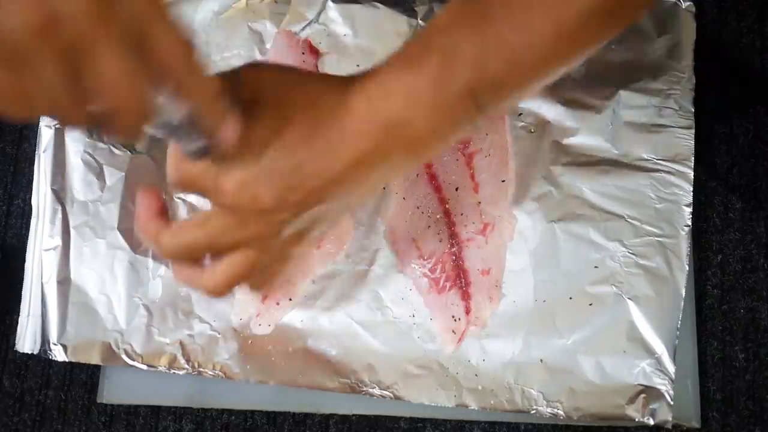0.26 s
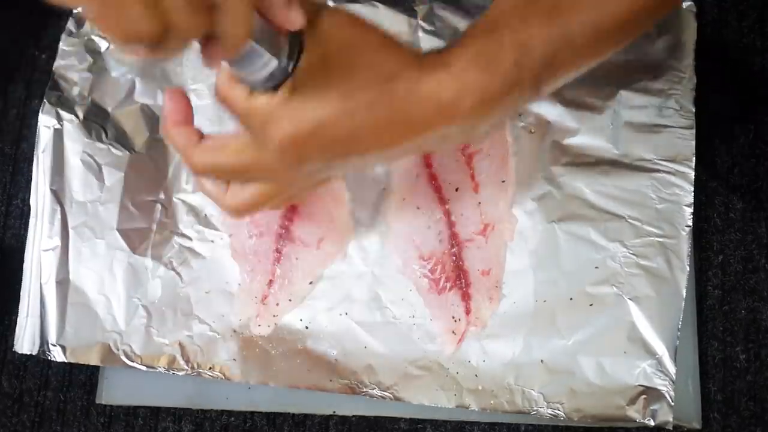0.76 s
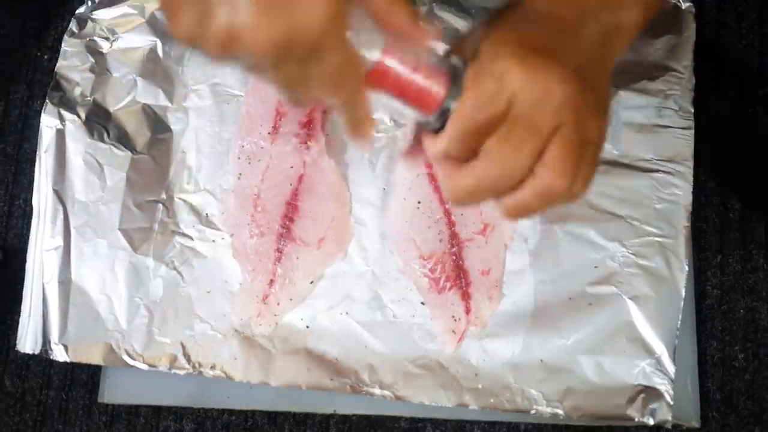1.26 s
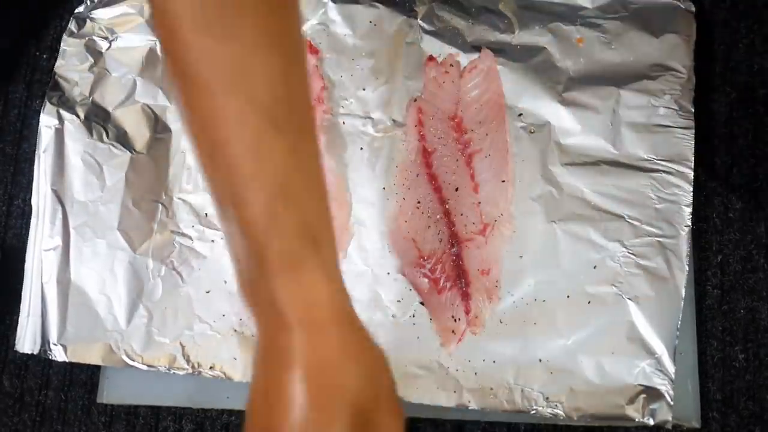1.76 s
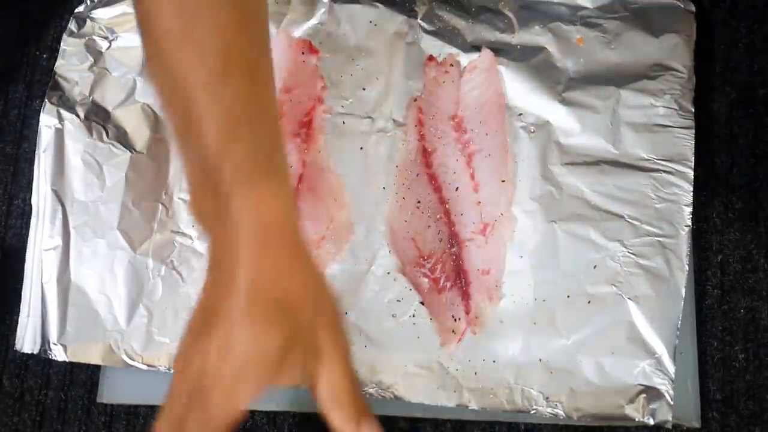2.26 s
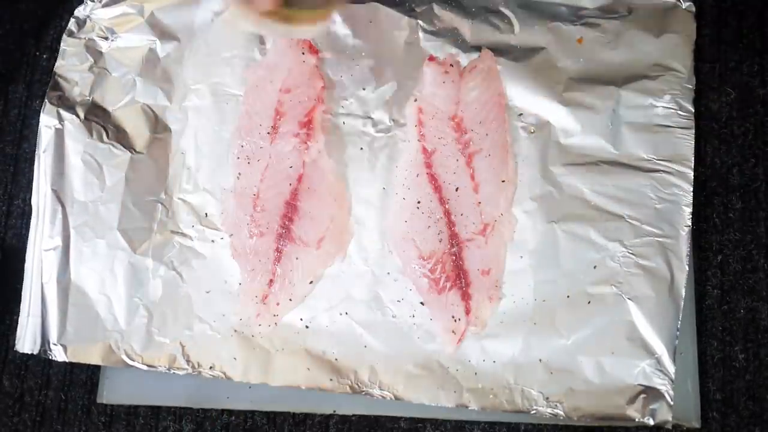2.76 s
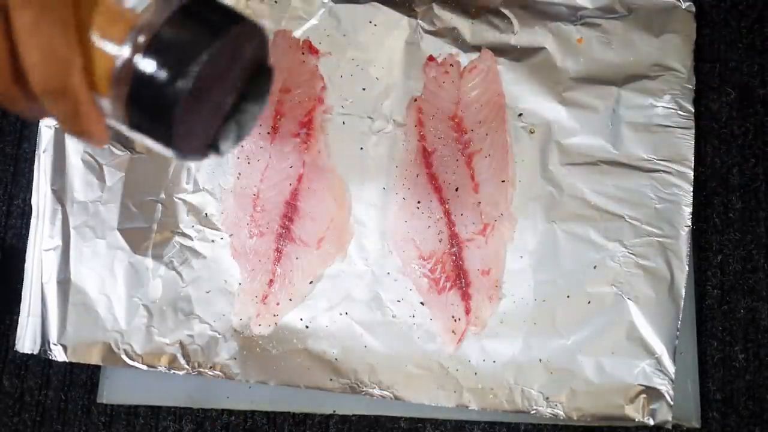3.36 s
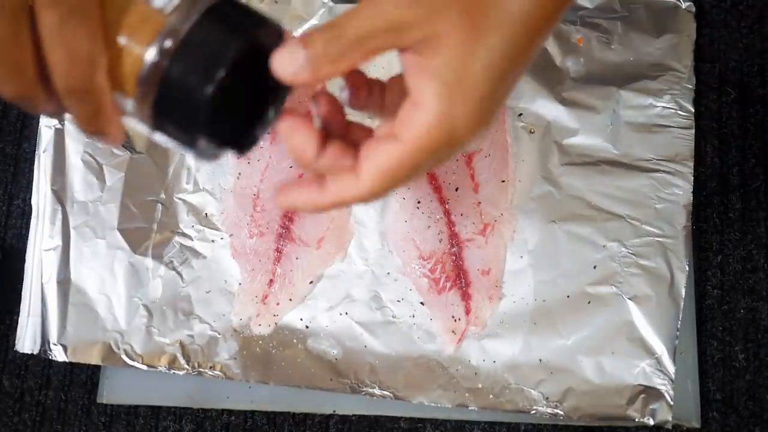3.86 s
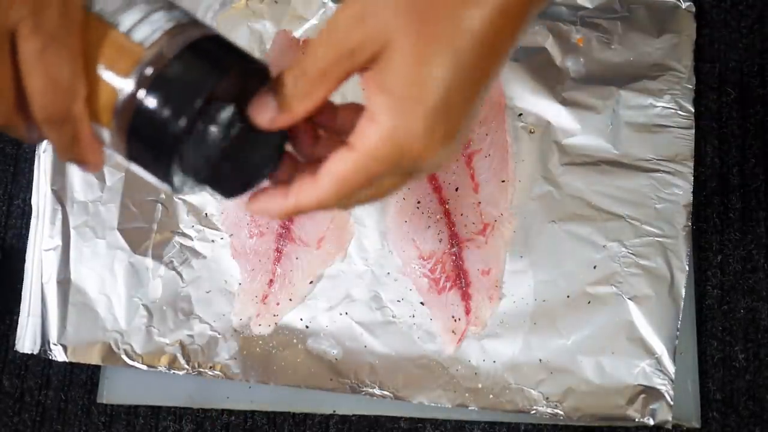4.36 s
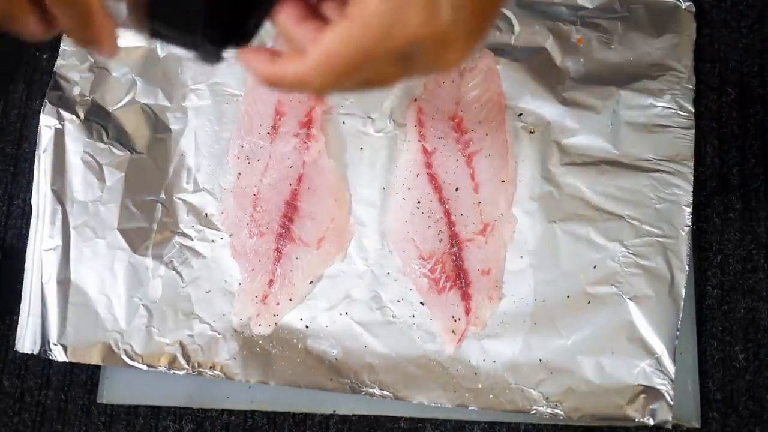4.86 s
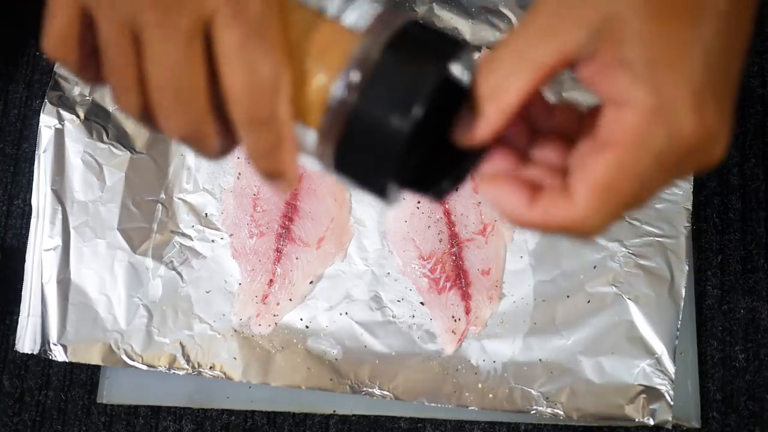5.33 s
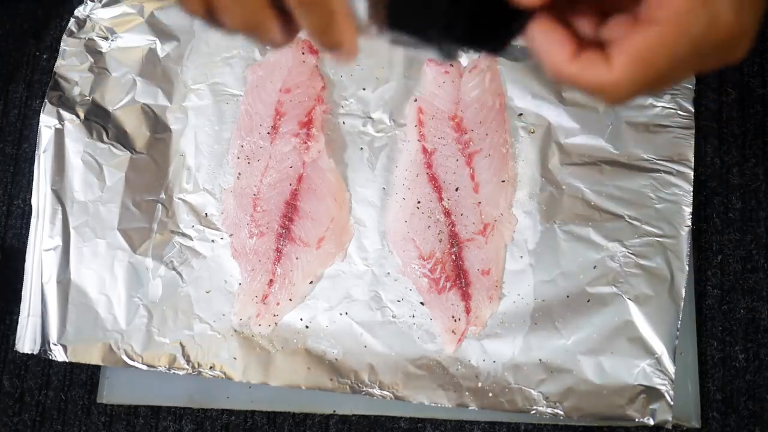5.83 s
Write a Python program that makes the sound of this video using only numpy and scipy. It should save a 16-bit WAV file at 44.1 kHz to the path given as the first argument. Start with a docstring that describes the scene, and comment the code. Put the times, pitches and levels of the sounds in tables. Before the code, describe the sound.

A salt mill crunches through four short twists, is set down with a hard clack, then a seasoning jar is tapped and shaken in soft hisses.

```python
"""Crystals crunch and crack in the ringing cavity of a salt mill, twisted four times over fish on foil.
The salt slides back in its jar, a hand bumps the table and the mill is set down with a clack.
Then a jar of fine seasoning is tapped and shaken: the powder hisses to and fro and rains on the foil.
Random grain trains excite resonances and coloured clicks for the salt and powder; bursts of noise
excite them for each contact. Sparse reflections, low hums and quiet air surround the work."""
import sys
import numpy as np
from scipy import signal
from scipy.fft import rfft, irfft
from scipy.io import wavfile

SR = 44100
rng = np.random.default_rng(int(sys.argv[2]) if len(sys.argv) > 2 else 0)


def log_audio(samples):
    """Write samples as a 16-bit WAV file to the path given in sys.argv[1]."""
    # one column per channel
    frames = np.atleast_2d(samples).T
    # limit to full scale, then quantise
    limited = np.clip(frames, -1, 1)
    pcm = np.round(limited * 32767).astype(np.int16)
    wavfile.write(sys.argv[1], SR, pcm)


N = 268856
TIME, SHORT = np.arange(N) / SR, np.arange(8192) / SR  # seconds: the whole scene, one short sound

# Resonances of the mill's body. Each row: frequency in Hz, width in Hz, relative level in dB.
MILL_MODES = [(411.4, 59, -8), (880, 250, -12.5), (1815, 520, 1), (2660, 634, 1), (3470, 530, -3.5),
              (4230, 660, -4)]
# Forward twists that crush the salt. Each row: start in seconds, length in seconds, crushing level in dB,
# growth over the twist in dB, falling-salt level in dB.
TWISTS = [(0.046, 0.093, -27, 4.5, -37.5), (0.463, 0.075, -27.5, 7.5, -38), (0.872, .09, -24, -5.5, -40),
          (1.263, 0.068, -22.5, 1.5, -37.5)]
# Light turns back, the burrs only scraping. Each row: start in seconds, length in seconds,
# scraping level in dB, dying-away time in seconds, falling-salt level in dB.
RETURNS = [(0.225, 0.11, -37, 0.045, -41), (0.611, 0.14, -43, 0.066, -41.5),
           (1.068, .105, -42, 0.036, -43.5)]
# Loose salt thrown about as the mill is moved and tipped upright. Each row: start in seconds,
# sliding time in seconds, rattle level in dB, settling time in seconds, level of the mill's ring in dB.
SPILLS = [(0.2, 0.024, -47, 0.023, -58), (1.043, .004, -44.5, 0.016, -41.5), (1.2, 0.049, -47.5, .02, -71),
          (1.408, .01, -36, 0.094, -48.5), (1.56, 0.069, -49, .045, -60), (1.754, .02, -48, .01, -62),
          (1.783, 0.037, -31.5, 0.029, -35), (1.894, 0.029, -46.5, 0.031, -49.5),
          (2.004, 0.007, -49.5, 0.027, -51.5)]
# The mill lands and rocks on its base. Each row: time in seconds, level in dB.
CLACKS = [(2.2883, -12.5), (2.3038, -28.5), (2.3118, -30)]
RETURN_RISE_S, SPILL_RISE_S = 0.0045, 0.0061


def gain_of(db):
    """Decibels to an amplitude ratio, by the logarithmic law of level."""
    return 10 ** (np.asarray(db) / 20)


def evened(x):
    """Normalises the mean power, to rms 1."""
    return x / np.sqrt(np.mean(x ** 2) + 1e-20)


def blow(x, db):
    """Sets a short sound by its energy: that of an rms at this level lasting 4 ms."""
    blow_s = .004
    return gain_of(db) * x * np.sqrt(blow_s * SR / np.sum(x ** 2))


def read(points, hz):
    """Interpolates a spectrum over log frequency."""
    f, value = np.transpose(points)
    return np.interp(np.log(hz + 1), np.log(f + 1), value)


def level(rows):
    """An envelope linear in decibels between (seconds, dB) points, silent outside them."""
    s, db = np.transpose(rows)
    inside = (TIME >= s[0]) * (TIME <= s[-1])
    return gain_of(np.interp(TIME, s, db)) * inside


def add(mix, s, sound):
    """Superposes a sound on the mix at a time in seconds."""
    part = mix[max(round(s * SR), 0):][:len(sound)]
    part += sound[:len(part)]


def click(points):
    """Minimum-phase click: the Hilbert transform of the log spectrum supplies the causal phase."""
    hz = abs(np.fft.fftfreq(len(SHORT), 1 / SR))
    log_gain = np.log(gain_of(read(points, hz)))
    spectrum = np.exp(np.conj(signal.hilbert(log_gain)))
    return np.fft.ifft(spectrum).real[:len(SHORT) // 2]


def ringing(modes, stretch=1):
    """Modal superposition of damped sines; alternate signs make the ring swell before it dies."""
    total = 0
    for k, (hz, width, db) in enumerate(modes):
        decay = np.exp(-np.pi * width * SHORT)
        total = total + (-1) ** k * gain_of(db) * width * decay * np.sin(2 * np.pi * hz * stretch * SHORT)
    return total


def resonate(x, hz, width):
    """Heterodyne resonator: shifts the curve hz down to zero, low-passes, and shifts back."""
    turn = np.exp(2j * np.pi * np.cumsum(hz) / SR)
    r = np.exp(-np.pi * width / SR)
    return 2 * (turn * signal.lfilter([1 - r], [1, -r], x / turn)).real


def shatter(response, decay_s, spray):
    """A crumbling contact as a convolution: one sharp push, then a dying spray of tiny ones."""
    push = rng.standard_normal(len(SHORT)) * np.exp(-SHORT / decay_s)
    push *= spray / np.linalg.norm(push)
    push[0] += 1
    return signal.fftconvolve(push, response)[:len(SHORT)]


def grains(response, per_s, spread_db):
    """Shot noise: randomly timed grains of random size and sign excite one response; rms 1."""
    size = gain_of(spread_db * np.minimum(rng.exponential(1, N), 4))
    train = size * rng.choice([-1, 1], N) * (rng.random(N) < per_s / SR)
    return evened(signal.oaconvolve(train, response)[:N])


def drift(per_s):
    """Noise low-passed by a Gaussian wanders smoothly; rms 1."""
    lowpass = np.exp(-(np.fft.rfftfreq(N, 1 / SR) / per_s) ** 2)
    return evened(irfft(rfft(rng.standard_normal(N)) * lowpass, N))


def stereo(mid, side, width_db):
    """Mid-side principle: a shared part plus a part opposed between left and right."""
    return mid + np.outer([1, -1], gain_of(width_db) * side)


def stroke(s, length, rise_s, fall_s, growth_db=0):
    """Exponential onset and decay of one gesture, around a hold that grows or fades in dB."""
    t = TIME - s
    outside = np.minimum(t, 0) / rise_s - np.maximum(t - length, 0) / fall_s
    return np.exp(outside) * gain_of(growth_db * np.clip(t / (length + 1e-9), 0, 1))


def together(gains):
    """Incoherent addition: independent sounds add in power."""
    return np.sqrt(sum(gain ** 2 for gain in gains))


def air():
    """Stationary coloured noise, nearly coherent between the two sides."""
    # Colour of the background. Each row: frequency in Hz, relative level in dB.
    air_colour = [(15, -30.5), (25, -9), (134, -5), (293, -5.5), (354, -6), (531, -7.5), (641, -8.5),
                  (988, -9.5), (1070, -10.5), (1700, -11.5), (13200, -22.5), (14400, -26), (16000, -19.5)]
    # Opposed part of the background. Each row: frequency in Hz, level relative to the shared part in dB.
    air_width = [(30, -17.5), (250, -19), (1000, -17), (4000, -14.5), (14000, -13)]
    air_db = -64.5
    hz = np.fft.rfftfreq(N, 1 / SR)
    mid, side = rfft(rng.standard_normal((2, N))) * gain_of(read(air_colour, hz))
    side = side * gain_of(read(air_width, hz))
    return gain_of(air_db) * evened(irfft(np.array([mid + side, mid - side]), N))


def hum():
    """Frequency modulation: faint low tones waver slightly as they come and go during the grinding."""
    # Each row: start in seconds, length in seconds, frequency in Hz (before the waver), level in dB
    # (of the steady tone).
    hums = [(0.77, 0.058, 185, -70), (1.02, .17, 152, -64), (1.37, .09, 143, -68.5)]
    waver = np.exp(.025 * drift(per_s=14))
    out = np.zeros(N)
    for s, length, hz, db in hums:
        tone = evened(np.sin(2 * np.pi * np.cumsum(hz * waver) / SR))
        out += gain_of(db) * stroke(s, length, rise_s=.015, fall_s=.02) * tone
    return out


def surroundings(x):
    """Reverberant decay: sparse reflections die at a rate set by band, a little different on each side."""
    # Decay of the surroundings. Each row: frequency in Hz, time to fall 60 dB in seconds.
    room_t60 = [(150, 0.32), (600, 0.25), (2000, 0.14), (6000, 0.23), (14000, 0.13)]
    t = np.arange(SR // 2) / SR
    sparse = rng.random((2, len(t))) < 3000 / SR
    taps = rng.standard_normal((2, len(t))) * sparse * (t > .003)
    hz, at, z = signal.stft(taps, SR, nperseg=256)
    decay = gain_of(-60 * at / read(room_t60, hz)[:, None])
    mid, side = signal.istft(z * decay, SR, nperseg=256)[1]
    response = stereo(mid, side, width_db=-28.5) / np.linalg.norm(mid)
    return signal.fftconvolve(x[None], response, axes=1)[:, :N]


def setting_down():
    """Impact excites modes: the table booms under the hand; the clacking mill rings its jar and jolts its salt."""
    # Soft blows on the table. Each row: time in seconds, level before the soft onset in dB,
    # frequency in Hz, time to fall 60 dB in seconds.
    bumps = [(1.998, -33, 85.5, 0.38), (2.318, -40, 106, 0.31), (2.586, -47.5, 84.6, 0.094)]
    # Resonances of the mill's base on the table. Each row: frequency in Hz, width in Hz, relative level in dB.
    base_modes = [(220, 44, -4), (706, 180, -14), (1097, 105, -5.5), (2033, 285, -9), (2395, 340, -10),
                  (3650, 220, -2), (4470, 260, -0.5), (5525, 560, -1.5), (6870, 290, -20.5)]
    # Partials of the jar after a clack. Each row: frequency in Hz, relative level in dB,
    # time to fall 60 dB in seconds.
    jar_partials = [(2600, -9, 0.087), (3300, 7, 0.092), (3870, -22, 0.086), (3770, -3.5, 0.26),
                    (4130, -3.5, 0.082), (5090, 4, 0.048), (5640, 2.5, .13), (5850, 4.5, .07),
                    (6180, -9, 0.18)]
    out, t = np.zeros(N), np.arange(SR) / SR
    for s, db, hz, t60 in bumps:
        onset = 1 - np.exp(-t / 0.0022)
        add(out, s, gain_of(db - 60 * t / t60) * onset * np.sin(2 * np.pi * hz * t))
    jar = sum(gain_of(db - 60 * SHORT / t60) * np.sin(2 * np.pi * hz * SHORT) for hz, db, t60 in jar_partials)
    jumping = click([(100, -7.5), (500, -4), (1300, -5.5), (2000, -5), (3600, -2), (6000, -8),
                     (8000, -16), (12000, -18.5), (16000, -46)])
    base = ringing(base_modes)
    rebound = np.interp(SHORT - .00064, SHORT, base, left=0)
    base = base - 0.47 * rebound  # the base springs back at once, which hollows out its colour
    for s, db in CLACKS:
        add(out, s, blow(shatter(base, decay_s=0.00088, spray=.2), db))
        add(out, s, blow(jar, db - 19.0))
        add(out, s, blow(shatter(jumping, decay_s=0.023, spray=12), db - 13.0))
    # the table top shudders low while the hand leans on it
    low = click([(15, -22.5), (45, 3.5), (110, -6.0), (300, -17.5), (1000, -34.5), (8000, -65.5)])
    leaning = level([(1.93, -74), (2.02, -48), (2.2, -63.5), (2.37, -53.5), (2.52, -67.5), (2.7, -75)])
    return out + grains(low, per_s=750, spread_db=-1.5) * leaning


def handling():
    """Contact excitation: bright ticks, taps that ring the cap over a low thud, and faint stick-slip squeaks."""
    # Hard grains and jar edges ticking. Each row: time in seconds, level in dB, centre frequency in Hz.
    ticks = [(0.1967, -32, 5300), (0.411, -42.5, 5400), (0.619, -33.5, 4060), (1.06, -33.5, 4760),
             (1.4064, -25, 4900), (1.444, -30, 5900), (1.62, -34.5, 4700), (1.653, -45, 4870),
             (1.686, -41, 4530), (1.733, -49, 5900), (1.7688, -29, 5900), (1.778, -23.5, 7600),
             (1.79, -27, 6760), (1.799, -23.5, 6930), (1.8666, -38, 3180), (1.9078, -36, 7600),
             (2.008, -38.5, 3940), (2.152, -37, 3400), (2.177, -46, 6100), (2.253, -27, 5970),
             (4.348, -45.5, 5840), (4.613, -42.5, 6220), (4.924, -48, 5400), (4.96, -56, 6500),
             (5.371, -32.5, 5160), (5.3803, -32.5, 5730), (5.46, -39.5, 5230), (5.53, -39.5, 6370),
             (5.932, -34, 6500), (5.952, -42.5, 4600), (6.084, -26, 4870), (6.0925, -27, 4820)]
    # Fingers and jars tapping. Each row: time in seconds, click level in dB, favoured frequency in Hz,
    # thud level in dB.
    taps = [(2.102, -53, 1326, -54.5), (2.211, -48.5, 2920, -51.5), (2.44, -54, 2186, -71),
            (2.588, -40.5, 420, -33.5), (2.599, -40.5, 3940, -43.5), (2.634, -44.5, 1570, -55.5),
            (2.7547, -32, 1880, -39), (2.792, -57, 1500, -53), (2.946, -52, 3200, -52.5),
            (3.21, -45.5, 1870, -47.5), (3.593, -51, 3040, -72), (3.849, -49.5, 980, -44.5),
            (3.873, -42.5, 2350, -54), (3.94, -44, 2200, -79), (3.945, -33.5, 2380, -77),
            (4.087, -39, 3030, -51), (4.0976, -46.5, 2670, -46), (4.231, -35.5, 1300, -46.5),
            (4.358, -51.5, 5000, -51.5), (4.776, -50.5, 1164, -55), (4.803, -52.5, 2340, -72),
            (5.035, -45.5, 1340, -57), (5.601, -43, 2170, -65), (5.615, -51, 3000, -70),
            (5.804, -50, 2027, -69), (5.896, -38.5, 2400, -75.5), (5.915, -45, 2220, -71)]
    # Resonances of the seasoning jar and its cap. Each row: frequency in Hz, width in Hz,
    # level in dB (before the tap's weighting).
    cap_modes = [(449, 34, 4.5), (724, 230, 1), (1225, 180, 3.5), (1831, 300, -1), (2516, 330, 1),
                 (3370, 1200, -1.5), (4300, 1600, -3.5), (6150, 480, 1)]
    # Fingers squeaking on the plastic. Each row: start in seconds, length in seconds,
    # frequency midway in Hz, level in dB (before the fade in and out).
    squeaks = [(4.413, 0.083, 2760, -62.5), (5.194, 0.087, 784, -60.5)]
    squeak_rise = 0.067  # share by which a squeak's pitch climbs
    tap_low_hz = 132  # the taps and thuds carry little sound below this
    out = np.zeros(N)
    for s, db, hz in ticks:
        colour = [(100, -28), (hz / 6, -23), (hz / 1.5, -6), (hz, 0), (hz * 1.7, -8), (12000, -14), (16000, -32)]
        add(out, s, blow(shatter(click(colour), decay_s=0.0035, spray=2.9), db))
    for (s, db, hz, thud_db), grip in zip(taps, rng.standard_normal(len(taps))):
        # the hardness of the contact decides which of the cap's resonances speak
        cap = ringing([(f, width, mode_db - 9 * abs(np.log2(f / hz))) for f, width, mode_db in cap_modes])
        add(out, s, blow(shatter(cap, decay_s=0.0016, spray=0.94), db))
        add(out, s, blow(shatter(cap, decay_s=0.015, spray=13), db - 21))  # the contents settle
        thud = ringing([(199, 52, -3.5), (400, 310, -18)], stretch=np.exp(0.1 * grip))
        add(out, s, blow(thud, thud_db))
    for s, length, hz, db in squeaks:
        count = int(length * SR)
        glide = hz * (1 + squeak_rise * np.linspace(-.5, .5, count))
        slip = resonate(rng.standard_normal(count), glide, width=hz / 25)
        add(out, s, gain_of(db) * np.hanning(count) * evened(slip))
    highpass = signal.butter(2, tap_low_hz, "highpass", fs=SR, output="sos")
    return signal.sosfilt(highpass, out)


def powder():
    """Dense shot noise hisses: a swell for each shake, a burst for each jolt, a thin rain on the foil."""
    # The powder slides across its jar. Each row: middle in seconds, length in seconds, level in dB.
    shakes = [(2.548, .07, -65), (2.682, 0.15, -59.5), (2.827, 0.069, -51.5), (3.2, 0.076, -56),
              (3.324, 0.15, -53.5), (3.475, 0.039, -56), (3.572, 0.1, -56), (3.671, 0.033, -64),
              (3.869, 0.088, -53), (4.01, 0.059, -56), (4.155, 0.067, -58), (4.23, 0.032, -52.5),
              (4.336, 0.092, -62.5), (4.452, 0.072, -62.5), (4.575, 0.029, -59), (4.64, 0.055, -55.5),
              (4.736, 0.054, -55.5), (4.908, 0.057, -61.5), (4.983, 0.036, -57.5), (5.043, 0.047, -53.5),
              (5.162, .06, -51), (5.231, 0.048, -52), (5.324, 0.018, -66), (5.478, 0.076, -48),
              (5.604, 0.14, -52), (5.74, 0.044, -50.5), (5.807, 0.046, -54), (5.988, 0.12, -47)]
    # The powder is thrown against the jar all at once. Each row: time in seconds, level in dB,
    # settling time in seconds.
    jolts = [(2.59, -39.5, 0.015), (3.942, -51, 0.01), (5.373, -37, 0.0258)]
    # Colour of the powder in its jar. Each row: frequency in Hz, relative level in dB per Hz.
    powder_colour = [(100, -25), (600, -18.5), (1100, -12), (3000, -3.5), (4100, -0.5), (5400, 0),
                     (8000, -6), (11500, -8), (14000, -16.5), (16000, -16.5)]
    # Colour of the rain on the foil. Each row: frequency in Hz, relative level in dB per Hz.
    foil_colour = [(100, -25.5), (1000, -7), (2500, -13), (4200, 2), (6000, -4), (9000, -2), (12000, -7),
                   (14000, -13), (16000, -17)]
    # Rain from the tipped jar. The row: start in seconds, length in seconds, level in dB.
    sprinkle = (5.38, 0.76, -59.5)
    edge = 0.62  # how sharply a shake swells and fades
    slides = [gain_of(db) * np.exp(-edge * (2 * abs(TIME - s) / length) ** 2.24) for s, length, db in shakes]
    bursts = [gain_of(db) * stroke(s, 0, .0012, settle_s) for s, db, settle_s in jolts]
    in_jar = together(slides + bursts) * grains(click(powder_colour), per_s=10000, spread_db=4.0)
    s, length, db = sprinkle
    raining = gain_of(db) * stroke(s, length, rise_s=0.0035, fall_s=.05)
    return in_jar + raining * grains(click(foil_colour), per_s=6300, spread_db=3.5)


def salt():
    """Sparser shot noise patters: salt falls with every turn, rattles when moved, creeps until set down."""
    # Colour of falling salt. Each row: frequency in Hz, relative level in dB per Hz.
    salt_colour = [(60, -18), (500, -4), (900, -21), (1500, -13), (2300, -5), (3500, 3.5), (5500, 1),
                   (7500, -2.5), (11000, -5.5), (13500, -12.5), (16000, -29.5)]
    # Colour of salt rattling in the mill. Each row: frequency in Hz, relative level in dB per Hz.
    rattle_colour = [(60, -29), (300, -23), (550, -12), (900, -22), (1500, -14), (2300, -5.5), (3500, 1),
                     (5500, 0), (8000, -1.5), (11000, -4.5), (13500, -13.5), (16000, -31)]
    # salt falls faster as a twist goes on, thins out on the way back and patters on after each turn
    fall_growth_db, fall_rise_s, fall_tail_s = 6, 0.013, 0.019
    sift_fade_db, sift_tail_s, creep_db = -4, 0.06, -66.5
    ground = [gain_of(db) * stroke(s, length, fall_rise_s, fall_tail_s, fall_growth_db)
              for s, length, _, _, db in TWISTS]
    sifted = [gain_of(db) * stroke(s, length, RETURN_RISE_S, sift_tail_s, sift_fade_db)
              for s, length, _, _, db in RETURNS]
    spilled = [gain_of(db) * stroke(s, length, SPILL_RISE_S, settle_s) for s, length, db, settle_s, _ in SPILLS]
    creep = gain_of(creep_db) * (TIME < CLACKS[0][0])
    clumps = evened(gain_of(1.5 * drift(per_s=79)))  # the salt drops in small clumps
    falling = together(ground + sifted) * clumps * grains(click(salt_colour), per_s=3000, spread_db=2.0)
    return falling + together(spilled + [creep]) * grains(click(rattle_colour), per_s=2000, spread_db=2.5)


def cracking():
    """Impulsive fracture: a large crystal snaps and rings the body and the air in the mill's mouth."""
    # The largest crystals. Each row: time in seconds, ring of the mill in dB (before fixed offsets),
    # ring frequency in Hz, snap level in dB.
    cracks = [(0.0462, -26, 2150, -41), (0.0592, -14, 2056, -27), (0.0663, -21.5, 2200, -43),
              (0.0769, -13.5, 2110, -24), (0.0896, -12, 2220, -23), (0.103, -19.5, 2460, -25),
              (0.116, -15, 2000, -15.5), (0.1218, -17, 2044, -32), (0.1327, -14.5, 2350, -27),
              (0.302, -22.5, 2024, -40.5), (0.337, -23.5, 2110, -34.5), (0.4673, -20.5, 2440, -32),
              (0.4842, -15.5, 2080, -24.5), (0.4929, -8.5, 1960, -21), (0.5128, -18.5, 2500, -20.5),
              (0.518, -8.5, 2155, -16), (0.526, -14.5, 2317, -15.5), (0.5327, -8.5, 2277, -16.5),
              (0.555, -29, 2100, -34.5), (0.693, -35.5, 1990, -35), (0.718, -33.5, 2090, -40.5),
              (0.8541, -32, 2500, -38.5), (0.88, -18, 2200, -36), (0.891, -20, 1900, -28),
              (0.9134, -18.5, 2080, -14.5), (0.9424, -18, 1890, -29), (0.9616, -13, 2245, -16.5),
              (1.121, -35, 2200, -34.5), (1.145, -28, 2210, -39), (1.2652, -13, 1986, -22),
              (1.285, -15.5, 2390, -17), (1.3126, -25, 1900, -23), (1.315, -11.5, 1950, -24),
              (1.3256, -20.5, 1940, -18), (1.337, -14, 1790, -34), (1.349, -15.5, 2545, -18)]
    # Colour of a snap. Each row: frequency in Hz, relative level in dB per Hz.
    snap_colour = [(60, -33.5), (400, -19.5), (650, -23), (950, -3.5), (1300, -4.5), (2800, 10.5),
                   (3500, 7), (4500, 6), (6000, -5.5), (10000, -7), (13000, -15), (16000, -34.5)]
    out = np.zeros(N)
    swell = SHORT ** 2 * np.exp(-SHORT / .0009)  # the air takes a few cycles to build up
    for s, ring_db, hz, snap_db in cracks:
        add(out, s, blow(swell * np.sin(2 * np.pi * hz * SHORT), ring_db - 2.5))
        add(out, s, blow(shatter(ringing(MILL_MODES[:2]), decay_s=0.0028, spray=1.1), ring_db - 25))
        add(out, s, blow(shatter(click(snap_colour), decay_s=0.0024, spray=1.4), snap_db))
    return out


def in_mill(crumbs, ring_db, width):
    """Cavity resonance: the air in the mill's mouth rings, its pitch trembling with the hand."""
    # Pitch of that air as the turning hand covers and frees the mouth.
    # Each row: time in seconds, frequency in Hz (before the tremble).
    mouth = [(0.05, 2100), (0.12, 2100), (0.15, 2400), (0.23, 2480), (0.29, 2070), (0.34, 2170),
             (0.42, 2200), (0.49, 2100), (0.55, 2300), (0.63, 2430), (0.7, 2000), (0.77, 2150),
             (0.88, 2080), (1.05, 2050), (1.13, 2180), (1.19, 1960), (1.33, 1930), (1.8, 2037)]
    tremble = np.exp(.04 * drift(per_s=30))
    mouth_hz = np.interp(TIME, *np.transpose(mouth)) * tremble
    return evened(crumbs + gain_of(ring_db) * evened(resonate(crumbs, mouth_hz, width)))


def grinding():
    """Random excitation of a resonator: crystals crumble on each twist and scrape on the way back in the mill."""
    crush = together(gain_of(db) * stroke(s, length, 0.0084, 0.012, growth_db)
                     for s, length, db, growth_db, _ in TWISTS)
    scrape = together(gain_of(db) * stroke(s, length, RETURN_RISE_S, fall_s)
                      for s, length, db, fall_s, _ in RETURNS)
    tumble = together(gain_of(db) * stroke(s, length, SPILL_RISE_S, settle_s)
                      for s, length, _, settle_s, db in SPILLS)
    catching = evened(gain_of(2 * drift(per_s=63)))  # the burrs catch and let go
    body = ringing(MILL_MODES)
    crumbs = in_mill(grains(body, per_s=1300, spread_db=2.26), ring_db=-3.5, width=200)
    slips = in_mill(grains(body, per_s=380, spread_db=2.0), ring_db=2.5, width=120)
    loose = in_mill(grains(ringing(MILL_MODES[2:]), per_s=1300, spread_db=2.5), ring_db=6, width=310)
    return crush * catching * crumbs + scrape * slips + tumble * loose


def scene():
    """Direct and reflected sound superpose; the work and the setting down feed the reflections unequally."""
    near = grinding() + cracking() + salt() + powder() + handling()
    far = setting_down()
    reflected = surroundings(gain_of(-15) * near + gain_of(-26) * far)
    return near + far + reflected + hum() + air()


def record(dry):
    """Phase quadrature: two close microphone ports hear slightly different phases; then the band limit."""
    # Quadrature part, opposed between the ports. Each row: frequency in Hz, level in dB.
    port_difference = [(60, -27), (250, -23.5), (600, -27), (1400, -33.5), (2400, -40), (4000, -36),
                       (12000, -22.5)]
    edge_hz = 15750
    gain = gain_of(read(port_difference, np.fft.rfftfreq(N, 1 / SR)))
    apart = irfft(1j * rfft(dry.mean(0)) * gain, N)
    ports = dry + np.array([apart, -apart])
    lowpass = signal.firwin(255, edge_hz, window=("kaiser", 8), fs=SR)
    return signal.oaconvolve(ports, lowpass[None], "same")


dry = scene()
out = record(dry)
log_audio(out)
```